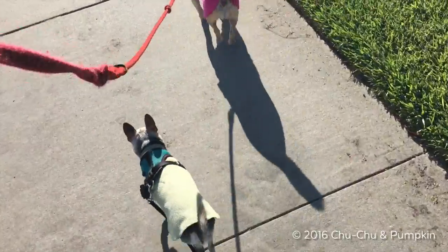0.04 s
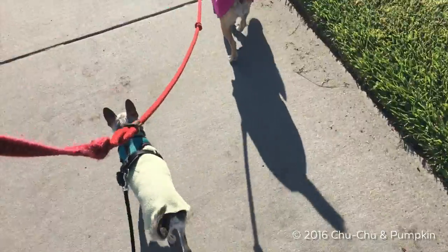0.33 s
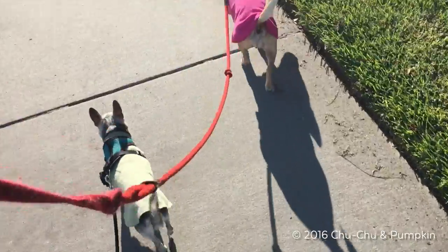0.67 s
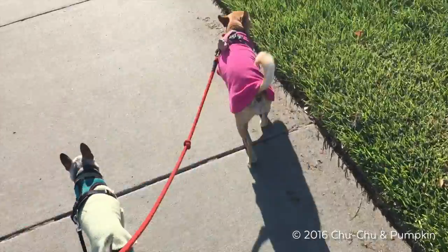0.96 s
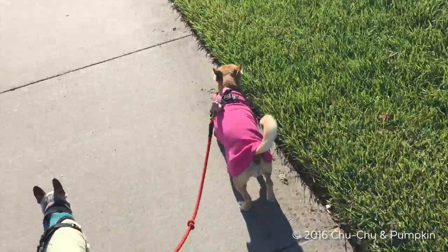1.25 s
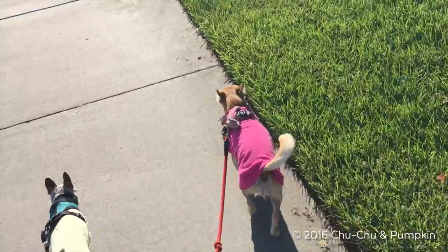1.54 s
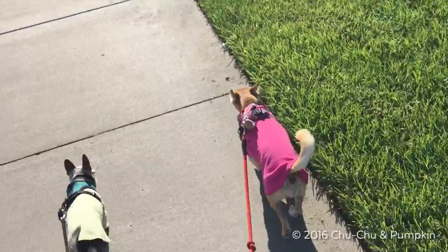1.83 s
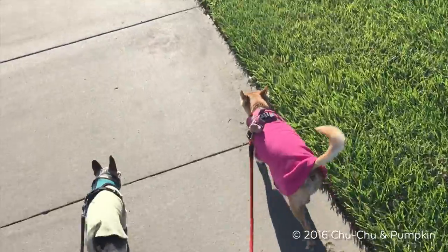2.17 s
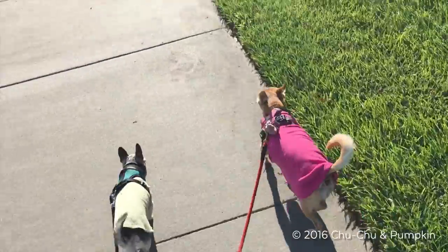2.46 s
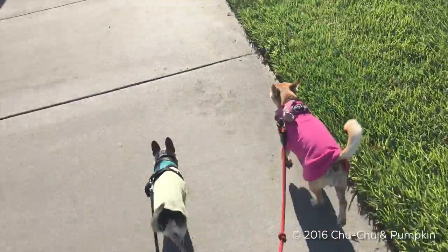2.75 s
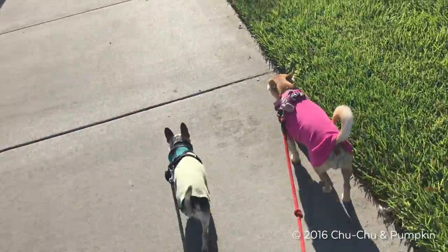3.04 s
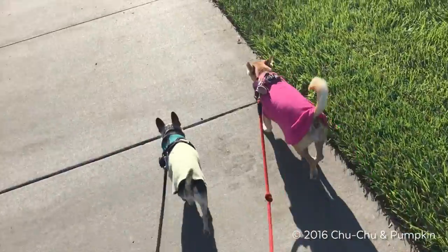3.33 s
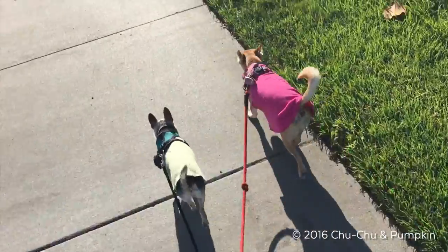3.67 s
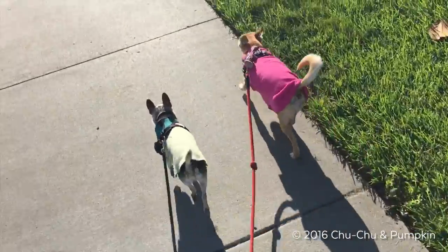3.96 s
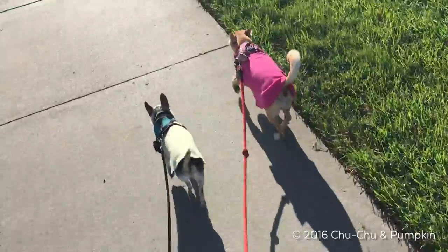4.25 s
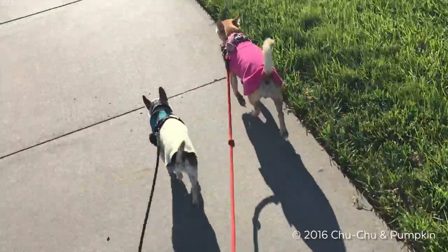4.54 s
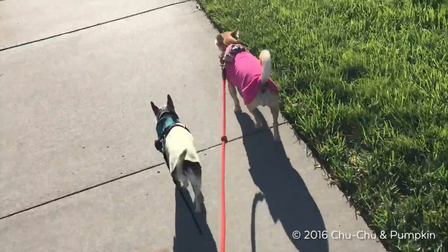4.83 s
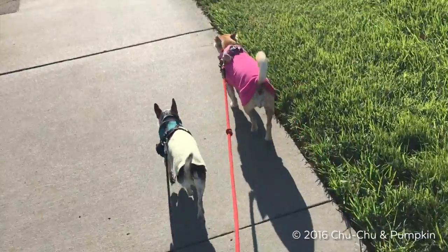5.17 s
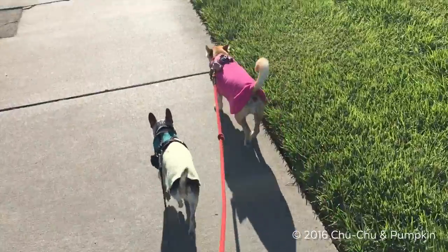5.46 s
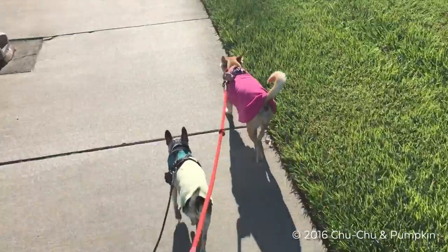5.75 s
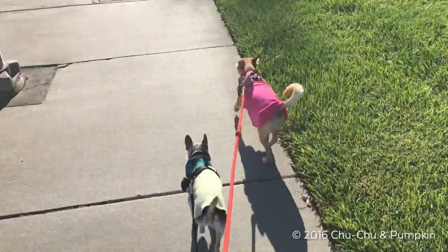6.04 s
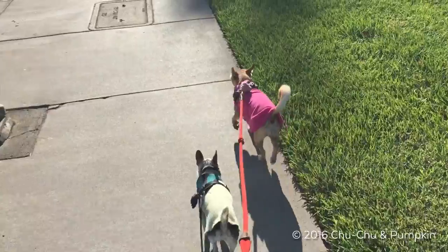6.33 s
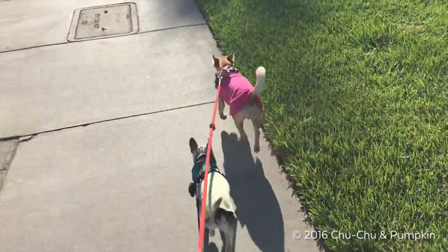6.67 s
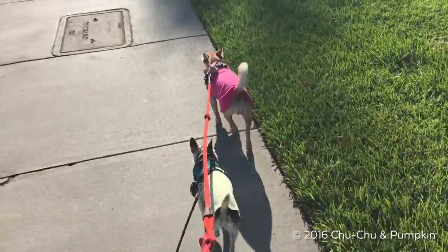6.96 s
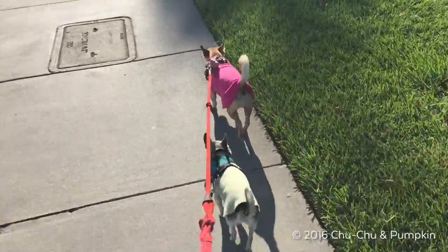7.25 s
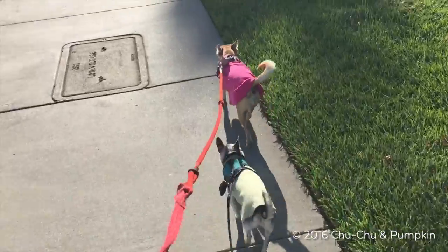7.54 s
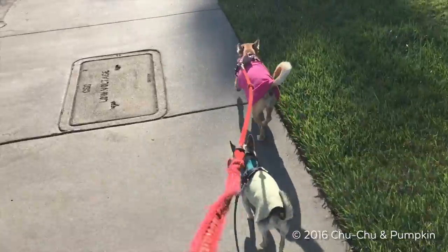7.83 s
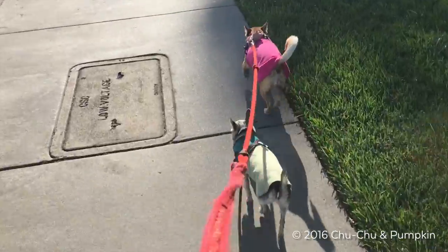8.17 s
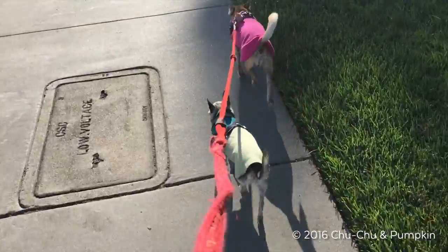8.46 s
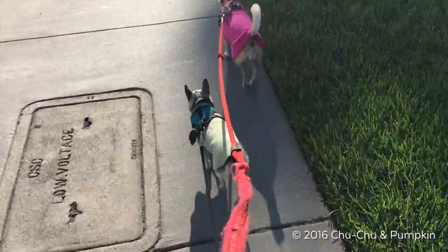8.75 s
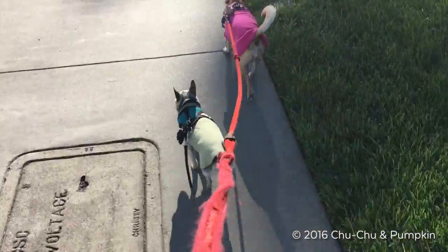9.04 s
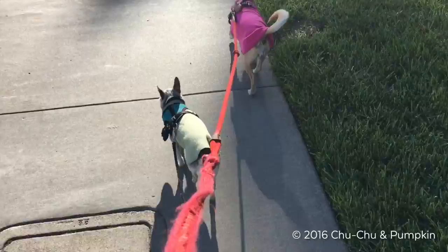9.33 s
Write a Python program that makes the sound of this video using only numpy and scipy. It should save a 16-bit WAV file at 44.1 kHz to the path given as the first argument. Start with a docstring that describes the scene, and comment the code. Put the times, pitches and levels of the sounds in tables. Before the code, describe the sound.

Leash clips and tags of two small dogs rattle in quick, bright bursts close to a hand-held microphone, with a few dull bumps as a leash pulls taut. The rattling thins to occasional ticks, leaving light paw and shoe scuffs on a concrete sidewalk and soft swishing clothes. A small bird chirps faintly three times before the metal rattles briefly again. Distant traffic murmurs throughout.

```python
"""Leash clips and tags of two small dogs knock in quick, bouncing rattles, close to the microphone.
It rides in the hand that holds the leashes, along a concrete sidewalk; tugs reach it as dull bumps.
Below, paws and shoes scuff the grit and claws tick; the walker's clothes swish once a stride.
Farther off, a small bird chirps faintly three times, a soft hiss swells once and traffic murmurs."""
import sys
import numpy as np
from scipy import signal
from scipy.fft import rfft, irfft
from scipy.io import wavfile
from scipy.ndimage import uniform_filter1d

SR = 44100
rng = np.random.default_rng(int(sys.argv[2]) if len(sys.argv) > 2 else 0)


def master(y):
    """Save y as 16-bit WAV."""
    cut = np.clip(np.atleast_2d(y).T, -1, 1)
    pcm = np.round(cut * 32767)  # scale
    wavfile.write(sys.argv[1], SR, pcm.astype(np.int16))


N = 423360


def leash_hardware(level_db=1.8, bass_cut_hz=3900, build_width_hz=1500, detune=.012, null_db=-16):
    """Small metal parts knock, damped at once; square-on knocks snap, glancing ones only ring high."""
    # broad modes that a square-on knock excites: f/Hz, width/Hz, relative level/dB
    body_modes = [(5330, 810, -26), (9830, 2800, 1.5), (14200, 1300, -5)]
    out, hz = np.zeros(N), np.linspace(0, SR / 2, 513)
    snap = abs(sum(gain_of(db) * mode(hz, f, width) for f, width, db in body_modes))
    radiation = hz ** 2 / np.hypot(hz ** 2, bass_cut_hz ** 2)  # parts this small radiate little bass
    rows = knocks()
    chance = rng.uniform(-0.84, 1, (len(rows), 2))
    for (s, db, spot), (grip, angle) in zip(rows, chance):
        snap_db, low_db, ring_hz, width_hz, null_hz = colour_at(spot)
        # the low ring is a close pair of modes: the grip detunes it, the blow's angle sets the balance
        tuning = 1 + detune * grip
        pair = [(5143, 1), (5620, 0.47 * (1 + angle))]  # f/Hz, share
        low_ring = sum(share * abs(mode(hz, f * tuning, width_hz=465)) ** 2 for f, share in pair)
        high_ring = abs(mode(hz, ring_hz, width_hz)) ** 2
        power = high_ring ** 2 + (gain_of(snap_db) * snap) ** 2 + (gain_of(low_db) * low_ring) ** 2
        null = abs(1 - (1 - gain_of(null_db)) * mode(hz, null_hz, width_hz=450))
        knock = struck(radiation * null * np.sqrt(power))
        # the ring swells a few cycles after the snap
        build_up = np.exp(2j * np.angle(mode(hz, ring_hz, build_width_hz)))
        add(out, s, gain_of(db + level_db) * irfft(rfft(knock) * build_up))
    return out


def knocks(uneven_db=1.0):
    """The hook knocks singly or stutters through its ring, strength and spot gliding along the run."""
    # single knocks: t/s, relative energy/dB, spot on the hook/0-1
    single_knocks = [(.092, -11, 0.33), (.3559, -6, 0), (.4402, -17.5, .04), (.5841, -3, 0.12),
                     (.6871, -7.5, 0), (.7041, -1.5, .01), (.989, 3, .19), (1.0013, -10.5, 0.3),
                     (1.4094, -9, 0.85), (2.1842, 0.5, 0.46), (2.194, -13, 0.52), (2.2273, -21, 0.6),
                     (2.326, -28.5, .7), (3.0863, -40, .7), (3.6124, -39, .7), (4.2168, -25.5, 0.77),
                     (5.262, -37.5, .56), (5.3234, -37, .78), (5.382, -37, .85), (6.5322, -29.5, 0.54),
                     (6.6079, -40.5, 0.7), (7.1453, -28, 0.43), (7.553, -17, 0.66), (7.6325, -32, .69),
                     (7.737, -36, .7), (7.9858, -27, 0.96), (8.1796, -27, 0.96), (8.4983, -15, .77),
                     (8.5326, -24.5, .54), (8.5866, -18.5, .3), (8.8262, -30, 0.9), (8.879, -23, 0.93),
                     (9.4355, -40, .7)]
    # runs: first t/s, last t/s, count, ratio of each gap to the one before,
    # first and last relative energy/dB, first and last spot/0-1
    rattles = [(0.0265, .0782, 5, .89, -7, -8.5, .08, 0.31), (0.117, .1475, 3, 1.1, -28, -30, 0.22, .6),
               (0.1952, 0.2285, 3, .857, -3.5, -2, 0.83, 0.83), (.2404, .2613, 3, 1.2, -7, -17, 0.82, .78),
               (0.271, 0.318, 4, 1.15, -8, -23.5, 0.19, .17), (.3793, .4142, 3, .94, -4, -17, .02, .08),
               (0.607, .649, 3, .7, -22, -29, .15, .02), (0.719, 0.7422, 3, 1.04, -11, -11.5, 0.16, 0.33),
               (1.062, 1.1168, 5, 1.06, -7.5, -18.5, 0.11, 0.32),
               (1.2652, 1.3394, 3, 1.04, -7.5, -11, 1, 0.92),
               (1.489, 1.5321, 3, 1.02, -13.5, -16.5, 0.29, .38),
               (1.6515, 1.7215, 3, 1.1, -17, -28, 0.81, 0.8),
               (1.8767, 1.9098, 3, 2.4, -16, -25, 0.37, 0.43), (4.2574, 4.2687, 3, 1, -36, -34, .72, .6),
               (8.465, 8.4814, 3, 3.2, -1, -1.5, .86, .87)]
    rows = list(single_knocks)
    for first_s, last_s, count, gap_ratio, first_db, last_db, first_spot, last_spot in rattles:
        elapsed = np.r_[0, np.cumsum(gap_ratio ** np.arange(count - 1))]
        times = first_s + (last_s - first_s) * elapsed / elapsed[-1]
        levels = np.linspace(first_db, last_db, count) + uneven_db * rng.standard_normal(count)
        rows += zip(times, levels, np.linspace(first_spot, last_spot, count))
    return rows


def colour_at(spot):
    """The spot where a knock lands on the hook sets its colour."""
    # colours along the hook: spot/0-1, snap and low ring level/dB against the high ring,
    # high ring f/Hz, its width/Hz, f/Hz where neighbouring modes cancel
    spot_colours = [(0, -42, -28, 13030, 2490, 11850), (.15, -23.5, -18, 12460, 2200, 11800),
                    (.3, -14, -15, 11750, 1200, 10950), (.45, -13, -5, 11600, 950, 10750),
                    (.6, -3, 5.5, 11820, 1100, 10700), (.7, -13, 7.5, 12300, 2400, 10750),
                    (.85, -7.5, -3, 12200, 4000, 10750), (1, -9, -4.5, 14200, 3000, 12400)]
    spots, *columns = np.transpose(spot_colours)
    return [np.interp(spot, spots, column) for column in columns]


def after_ring(knocking):
    """Faint modes of the hook sing on after each knock."""
    # lingering modes: f/Hz, gain/dB, t60/s
    lingering_modes = [(5170, -14, .035), (11650, -14.5, .06)]
    t = np.arange(SR // 4) / SR
    out = knocking.copy()
    for hz, db, t60 in lingering_modes:
        decay = gain_of(-60 * t / t60)
        ring = 2 * decay / decay.sum() * np.cos(2 * np.pi * hz * t)
        out += gain_of(db) * signal.oaconvolve(knocking, ring)[:N]
    return out


def high_fizz(level_db=-2, specks_per_s=4000):
    """Short swells of thin, high fizz around the knocks."""
    # swells of fizz: t/s, relative level/dB, half-length/s
    fizz_swells = [(.04, -52, 0.066), (.165, -56, 0.073), (.36, -48, .035), (.62, -44, .02),
                   (.695, -44.5, 0.052), (1.015, -57, .02), (1.31, -56, .1), (1.51, -56, .089),
                   (1.68, -56, .13), (8.56, -55, .048)]
    spectrum = [(3000, -19.5), (5200, -14), (7000, -21), (10000, -12), (11500, 2), (12600, 2.5),
                (14500, -4.5), (17000, -27.5)]  # f/Hz, relative level/dB
    specks = rng.standard_normal(N) * (rng.random(N) < specks_per_s / SR)
    return gain_of(level_db) * strokes(fizz_swells) * coloured(specks, spectrum)


def leash_tugs(knock_db=-8):
    """The leash snaps taut and bumps the hand that holds the microphone."""
    # tugs carried down the leash: t/s, energy/dB
    tugs = [(0.987, -15.5), (2.1862, -10.5), (8.4675, -19)]
    out, hz = np.zeros(N), np.linspace(0, SR / 2, 2049)
    thud = abs(mode(hz, centre_hz=170, width_hz=220)) ** 2
    knock = abs(mode(hz, centre_hz=950, width_hz=1300)) ** 2
    bump = struck(thud + gain_of(knock_db) * knock)
    for s, db in tugs:
        add(out, s, gain_of(db) * bump)
    return out


def footsteps(scuff_db=2.0, claws_db=-78.0):
    """Down on the concrete, each scuff crunches many grains of grit; claws patter lightly throughout."""
    # longer drags of paws and soles: t/s, relative level/dB, half-length/s
    scuffs = [(1.33, -54, .03), (2.495, -68, 0.033), (2.98, -70.5, 0.13), (3.6, -69.5, .08),
              (4.28, -65.5, 0.085), (5.374, -61, .03), (5.75, -73, 0.15), (6.0, -66, .04), (6.15, -70, .08),
              (6.615, -67.5, .05), (6.74, -65.5, .05), (7.62, -71, .13), (7.85, -73, 0.2),
              (8.238, -63.5, 0.018), (8.63, -64, 0.023), (8.92, -70, 0.12), (9.42, -73.5, 0.14)]
    # spectrum of crunching grit: f/Hz, relative level/dB
    grit_spectrum = [(2500, -16.5), (4300, -13), (5300, 4.5), (6800, -3), (9500, 1.5), (12000, 4.5),
                     (15000, 8), (17000, -2)]
    grit = coloured(grains(per_s=450, spread_db=3.5, decay_s=.001, width_hz=2500), grit_spectrum)
    claws = coloured(grains(per_s=70, spread_db=3.1, decay_s=.002, width_hz=2200), grit_spectrum)
    return gain_of(scuff_db) * strokes(scuffs + paw_falls()) * grit + gain_of(claws_db) * claws


def paw_falls(gap_s=.17, scatter_s=.039, db=-75.5, spread_db=3.5, half_s=.03):
    """Light, loosely regular touches of trotting paws: t/s, relative level/dB, half-length/s."""
    beats = np.arange(0, N / SR, gap_s)
    chance = rng.standard_normal((len(beats), 2))
    return [(s + scatter_s * late, db + spread_db * hard, half_s)
            for s, (late, hard) in zip(beats, chance)]


def grains(per_s, spread_db, decay_s, width_hz, colours=32):
    """Tiny random crunches of varied colour; most are small, a few large."""
    size = gain_of(spread_db * np.minimum(rng.exponential(1, N), 3))
    hits = size * (rng.random(N) < per_s / SR)
    colour = rng.integers(0, colours, N)
    t, hz = np.arange(1024) / SR, np.fft.rfftfreq(1024, 1 / SR)
    out = np.zeros(N)
    for k, centre_hz in enumerate(np.linspace(4500, 15500, colours)):
        burst = rng.standard_normal(len(t)) * np.exp(-t / decay_s)
        crunch = unit_rms(irfft(rfft(burst) * mode(hz, centre_hz, width_hz)))
        out += signal.oaconvolve(hits * (colour == k), crunch)[:N]
    return out


def clothing(level_db=2.5, first_stride_s=.51, stride_s=.535, half_swish_s=.29):
    """Near the microphone, cloth brushes on cloth once a stride: a soft band of noise."""
    # strength of the swishes: t/s, relative level/dB
    swish_levels = [(.5, -67.5), (1.05, -67.5), (1.6, -73), (2.1, -68), (2.65, -80), (3.7, -67.5),
                    (4.3, -66.5), (5.3, -70), (7.45, -68), (8.5, -78)]
    cloth = [(1000, -23.5), (2000, -3), (3000, 4.5), (3800, -1.5), (5000, -16.5), (8000, -25),
             (16000, -35)]  # f/Hz, relative level/dB
    strides = np.arange(first_stride_s - stride_s, N / SR, stride_s)
    swishes = [(s, np.interp(s, *np.transpose(swish_levels)), half_swish_s) for s in strides]
    return gain_of(level_db) * strokes(swishes) * noise(cloth)


def street_echo(x, ground_s=.008, ground_db=-32, scatter_db=-29, t60_s=0.11):
    """Open air: one weak echo off the pavement and a short, thin scatter."""
    t = np.arange(SR // 2) / SR
    tail = rng.standard_normal(len(t)) * gain_of(-60 * t / t60_s)
    tail *= gain_of(scatter_db) / np.linalg.norm(tail)
    tail[round(ground_s * SR)] += gain_of(ground_db)
    return x + signal.fftconvolve(x, tail)[:N]


def bird(waver=.025):
    """A faint, thin whistle that zigzags, a little differently each time."""
    # calls: t/s, level/dB
    calls = [(5.965, -70), (6.375, -67), (6.894, -66.5)]
    # zigzag of one call: t/s from its start, f/Hz, relative level/dB
    zigzag = [(0, 7300, -13.5), (.018, 8400, -1), (.027, 6830, -5.5), (.043, 7950, 1), (.055, 7350, 0),
              (.075, 7700, -16)]
    s, hz, db = np.transpose(zigzag)
    out, t = np.zeros(N), np.arange(0, s[-1], 1 / SR)
    for start, call_db in calls:
        wobble = unit_rms(uniform_filter1d(rng.standard_normal(len(t)), size=90))
        pitch = np.interp(t, s, hz) * (1 + waver * wobble)
        envelope = gain_of(call_db + np.interp(t, s, db))
        add(out, start, envelope * np.sin(2 * np.pi * np.cumsum(pitch) / SR))
    return out


def soft_hiss():
    """A smooth, high hiss swells once in the background and fades."""
    # rise and fall of the hiss: t/s, level/dB
    hiss_levels = [(0, -92.5), (5.0, -85.5), (6.05, -75.5), (6.9, -81.5), (7.6, -88.5), (9.6, -92)]
    spectrum = [(1500, -15.5), (3000, 1), (5000, 0), (7500, -1.5), (10000, -9),
                (16000, -21)]  # f/Hz, relative level/dB
    return gain_of(level_curve(hiss_levels)) * noise(spectrum)


def traffic(road_db=-41.18, rumble_top_hz=280, roar_bottom_hz=850, rumble_swing=0.83,
            hiss_db=-63.5, hiss_swing=0.14):
    """Far roads: engine rumble, a steady murmur, tyre roar and a little hiss that carries this far."""
    # spectra of the roads and of their hiss: f/Hz, relative level/dB
    road_spectrum = [(12, -35), (20, -4.5), (42, -2.5), (64, 0), (124, -3), (249, -7), (337, -9.5),
                     (384, -9), (455, -7.5), (593, -7), (676, -8), (985, -6.5), (1330, -13), (1580, -22),
                     (1800, -26), (2340, -40), (3960, -120)]
    hiss_spectrum = [(1200, -14), (1900, 1.5), (2900, -0.5), (3800, -4.5), (5000, -12.5), (7000, -20),
                     (10000, -20), (15500, -22)]
    # swells of engines and of tyres: t/s, relative level/dB (before any swing factor)
    rumble_levels = [(0, -42.5), (.75, -45), (1.4, -47.5), (2.1, -44.5), (2.6, -47), (3.7, -44.5),
                     (5.3, -46.5), (7.3, -46), (8.95, -45), (9.1, -41), (9.25, -46), (9.6, -45)]
    roar_levels = [(0.0, -50), (0.21, -49), (2.94, -45), (3.26, -47), (4.84, -46), (5.72, -46), (6.17, -50),
                   (7.59, -47), (8.87, -48.5), (9.6, -48)]
    hz = np.fft.rfftfreq(N, 1 / SR)
    rumble_db, roar_db = rumble_swing * swell(rumble_levels), swell(roar_levels)
    road = gain_of(road_db) * noise(road_spectrum)
    rumble = irfft(rfft(road) / (1 + (hz / rumble_top_hz) ** 4), N)
    roar = road - irfft(rfft(road) / (1 + (hz / roar_bottom_hz) ** 8), N)
    murmur = road - rumble - roar
    hiss = gain_of(hiss_db + hiss_swing * roar_db) * noise(hiss_spectrum)
    return gain_of(rumble_db) * rumble + murmur + gain_of(roar_db) * roar + hiss


def mode(hz, centre_hz, width_hz):
    """Complex response of one resonance, 1 at its centre."""
    return 1 / (1 + 2j * (hz - centre_hz) / width_hz)


def struck(gain):
    """The causal ring, of energy 1, whose magnitude spectrum has this shape."""
    log_gain = np.log(np.maximum(np.r_[gain, gain[-2:0:-1]], 1e-5))
    ring = np.fft.ifft(np.exp(np.conj(signal.hilbert(log_gain)))).real
    return ring / np.linalg.norm(ring)


def strokes(rows):
    """An envelope with one smooth swell centred on each row's time."""
    envelope = np.zeros(N)
    for s, db, half_s in rows:
        stroke = gain_of(db) * np.hanning(round(2 * half_s * SR))
        add(envelope, s - half_s, stroke[max(round((half_s - s) * SR), 0):])
    return envelope


def coloured(x, spectrum):
    """Filters x by a spectrum table, joined over log frequency; rms 1."""
    f, db = np.transpose(spectrum)
    hz = np.fft.rfftfreq(len(x), 1 / SR)
    gain = gain_of(np.interp(np.log(hz + 1), np.log(f + 1), db))
    return unit_rms(irfft(rfft(x) * gain, len(x)))


def noise(spectrum):
    """Steady noise of this spectrum, at rms 1."""
    return coloured(rng.standard_normal(N), spectrum)


def level_curve(points):
    """A level table in dB, at every sample."""
    return np.interp(np.arange(N) / SR, *np.transpose(points))


def swell(points):
    """A level curve in dB about its mean."""
    level = level_curve(points)
    return level - level.mean()


def gain_of(db):
    """Decibels to amplitude."""
    return 10 ** (np.asarray(db) / 20)


def unit_rms(x):
    """Scales to rms 1."""
    return x / np.sqrt(np.mean(x ** 2) + 1e-20)


def add(mix, s, sound):
    """Mixes a sound in at time s."""
    part = mix[max(round(s * SR), 0):][:len(sound)]
    part += sound[:len(part)]


def scene():
    """Near rattles and steps over the far traffic, at one hand-held microphone."""
    near = after_ring(leash_hardware()) + high_fizz() + footsteps()
    return (street_echo(near) + leash_tugs() + clothing() + bird() + traffic() + soft_hiss())[None]


def record(dry):
    """The recorder's band limit."""
    lowpass = signal.firwin(161, cutoff=16150, window=("kaiser", 8), fs=SR)
    return signal.oaconvolve(dry, lowpass[None], "same")


dry = scene()
out = record(dry)
master(out)
```